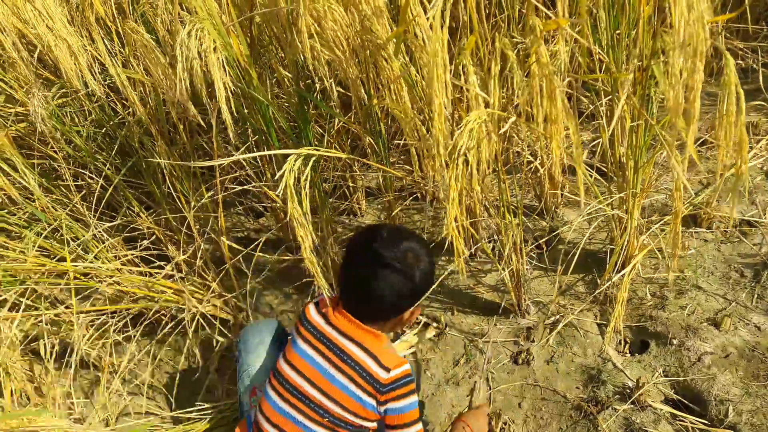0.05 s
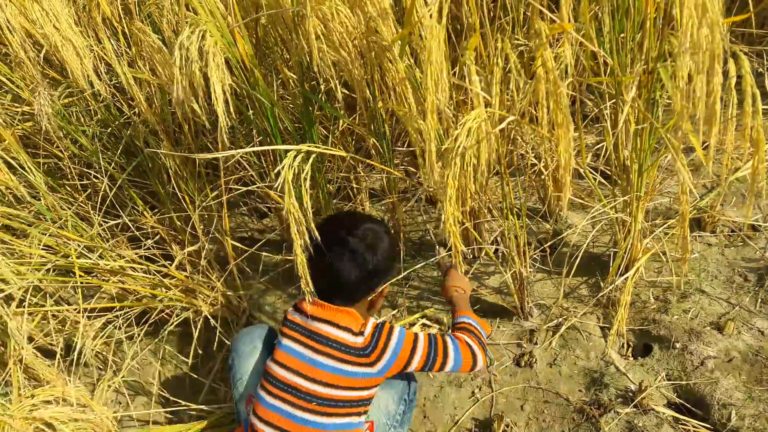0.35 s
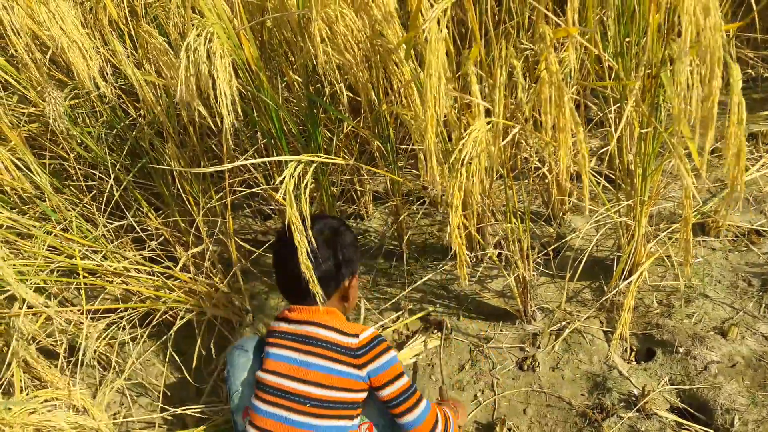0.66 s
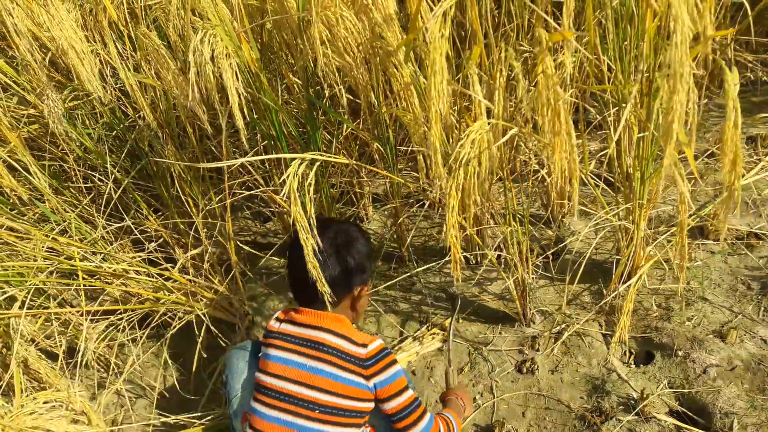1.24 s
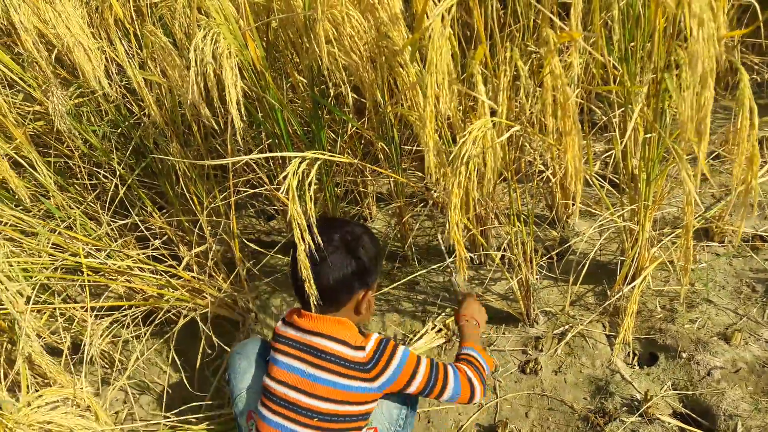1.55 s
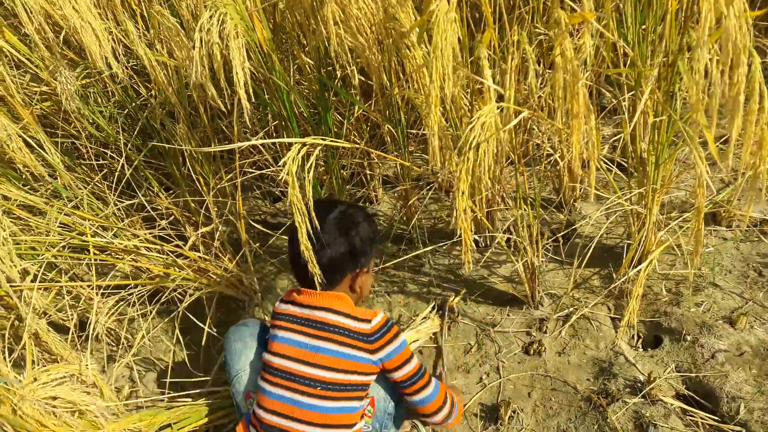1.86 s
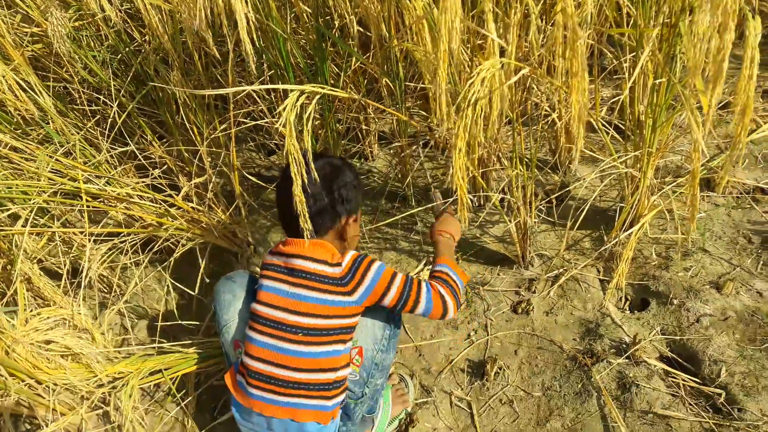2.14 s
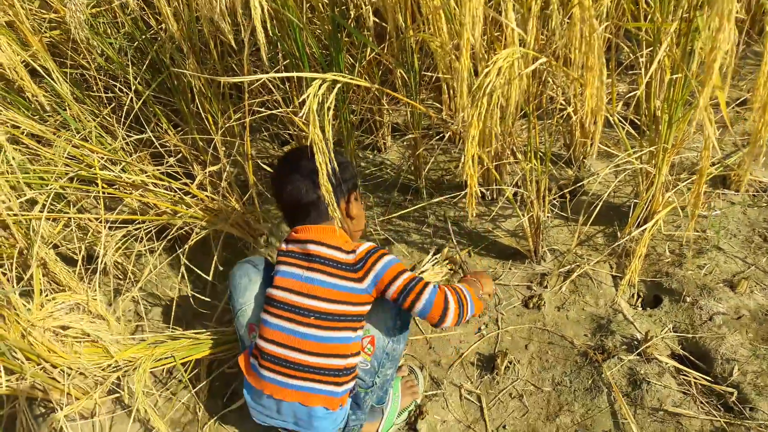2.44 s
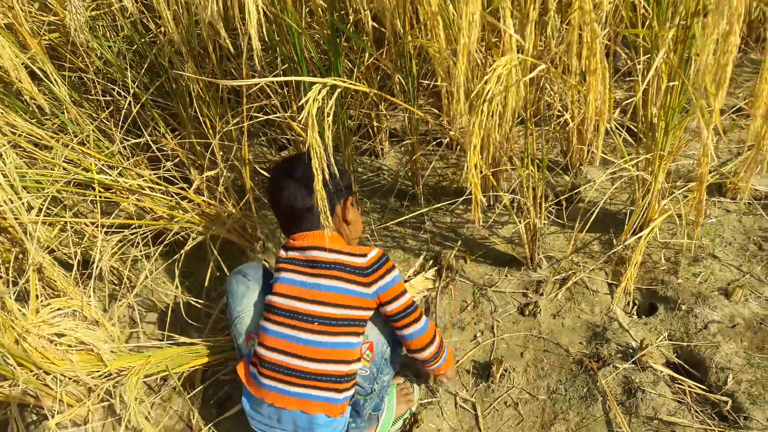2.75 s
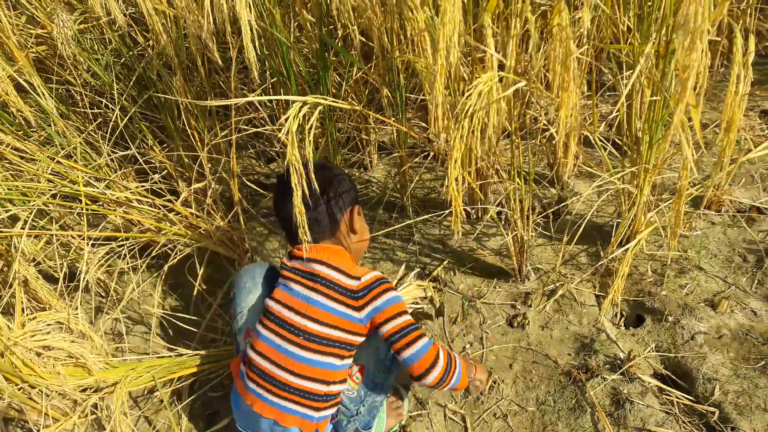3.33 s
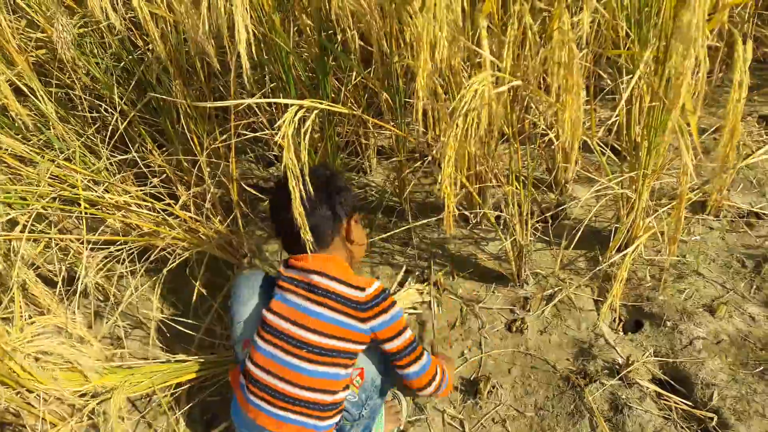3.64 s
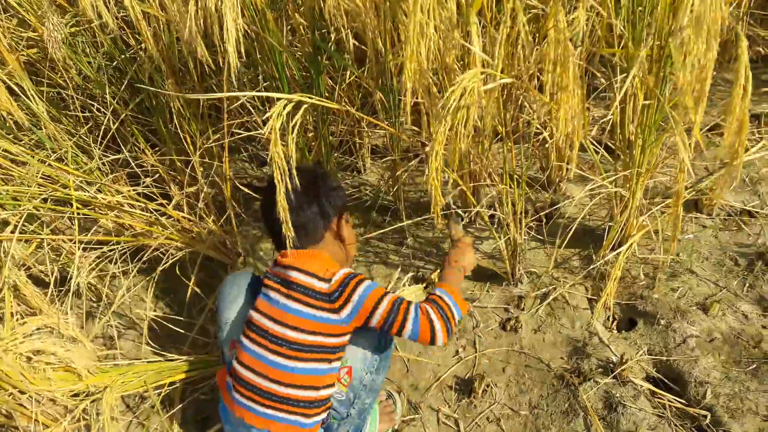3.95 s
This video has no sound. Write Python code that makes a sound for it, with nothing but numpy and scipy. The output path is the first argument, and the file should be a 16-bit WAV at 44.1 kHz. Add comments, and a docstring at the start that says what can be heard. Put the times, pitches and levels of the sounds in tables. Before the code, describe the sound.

A small hand tool chops into dry earth while dry stalks rustle and snap.

```python
"""At the edge of a rice field, a child chops at dry, cracked earth with a small hand tool.
Each blow is a crunch of breaking crust, a hollow clack of tool and clod and a thud as the ground
gives way, followed by a spray of crumbs. Loose soil is tapped, brushed and rubbed.
Dry stalks rustle and snap close by; far away a single-cylinder engine chugs in the open air."""
import sys
import numpy as np
from scipy import signal
from scipy.fft import rfft, irfft
from scipy.io import wavfile

SR = 44100
rng = np.random.default_rng(int(sys.argv[2]) if len(sys.argv) > 2 else 0)


def materialize(psi):
    """Save the field psi as 16-bit PCM at rate SR to the path in sys.argv[1].

    A 1-D psi becomes a single channel; in a 2-D psi each row is a channel.
    """
    bounded = np.clip(np.atleast_2d(psi).T, -1, 1)
    quanta = np.round(bounded * 32767).astype(np.int16)
    wavfile.write(sys.argv[1], SR, quanta)


N = 176400
TIME = np.arange(N) / SR
CUTOFF_HZ = 15700


def from_db(db):
    """Decibels to gain."""
    return 10 ** (np.asarray(db) / 20)


def unit_rms(x):
    """Scale to rms 1."""
    return x / np.sqrt(np.mean(x ** 2) + 1e-20)


def curves(rows):
    """One linear curve per column; the first column is time in seconds."""
    times_s, *columns = np.transpose(rows)
    return [np.interp(TIME, times_s, column) for column in columns]


def drift(rate_hz):
    """Slow random wander, spread about 1."""
    control_hz = 100
    noise = rng.standard_normal(int(N / SR * control_hz) + 200)
    pole = np.exp(-2 * np.pi * rate_hz / control_hz)
    slow = signal.lfilter([1], [1, -2 * pole, pole * pole], noise)[190:]  # skip the settling
    return np.interp(TIME * control_hz, np.arange(len(slow)), unit_rms(slow))


def colour(x, spectrum):
    """Minimum-phase filter with the given spectral shape and unit power gain."""
    size = 8192
    hz, db = np.transpose(spectrum)
    bins_hz = np.maximum(np.arange(size // 2 + 1) * SR / size, 1)
    gain = from_db(np.interp(np.log(bins_hz), np.log(hz), db))
    gain /= np.hypot(1, (0.5 * hz[0] / bins_hz) ** 2)  # bass roll-off
    gain /= np.sqrt(np.mean(gain[bins_hz < CUTOFF_HZ] ** 2))
    cepstrum = irfft(np.log(gain))
    cepstrum[1:size // 2] *= 2
    cepstrum[size // 2 + 1:] = 0
    impulse = irfft(np.exp(rfft(cepstrum)))[:size // 2]
    return signal.fftconvolve(x, impulse)[:N]


def band(x, hz, width_hz, passes=1):
    """Two-pole resonance, applied once per pass; rms 1."""
    radius = np.exp(-np.pi * width_hz / SR)
    feedback = [1, -2 * radius * np.cos(2 * np.pi * hz / SR), radius * radius]
    for _ in range(passes):
        x = unit_rms(signal.lfilter([1, 0, -1], feedback, x))
    return x


def grains(per_s, spread_db):
    """Tiny fractures of uneven size at random moments; rms 1."""
    sizes = from_db(spread_db * np.minimum(rng.exponential(1, N), 5))
    signs = rng.choice([-1, 1], N)
    return unit_rms(sizes * signs * (rng.random(N) < per_s / SR))


def burst(start_s, rise_s, t60_s, start_db=-20):
    """Envelope that rises to 1 and dies away, linear in dB."""
    age = TIME - start_s
    db = np.where(age < rise_s, start_db * (1 - age / rise_s), -60 * (age - rise_s) / t60_s)
    return from_db(np.clip(db, -300, 0)) * (age >= 0)


def swell(centre_s, half_s):
    """Gaussian envelope, peak 1."""
    return np.exp(-0.5 * ((TIME - centre_s) / half_s) ** 2)


# Spectra of breaking crust and of crumbs. Each row: frequency in Hz, relative gain in dB.
CRUNCH_SPECTRUM = [(130, -17), (220, -2.5), (400, -8), (540, -11.5), (760, -22.5), (1250, 0), (1800, 0),
                   (2300, -2), (2750, -7.5), (3500, 0.5), (4400, 1.5), (5200, -3), (5800, -14.5), (7000, 3),
                   (10000, -6.5), (16000, -7)]
CRUMB_SPECTRUM = [(120, -16), (220, 2.5), (460, -10), (800, -1.5), (1300, 1), (1900, 2.5), (2700, -15),
                  (4100, 2.5), (5700, -6.5), (7300, 5), (10000, 1.5), (16000, 0)]
# Tool blows. Each row: start and rise in seconds, crunch level in dB, its 2.8-6 kHz edge and its
# treble in relative dB, crumb level in dB, crumb T60 in seconds, thud pitch near its peak in Hz,
# thud level in dB, then frequency in Hz and level in dB for each of three clack resonances.
BLOWS = [(0.7544, 0.001136, -17, -14.5, 3, -27.5, .11, 323, -32, 696, -35.5, 1617, -23.5, 2070, -28),
         (2.0580, .0016, -12.5, -3, -3, -28.5, 0.13, 314, -24, 760, -30, 1230, -20, 1630, -19.5),
         (2.5085, 0.0022, -15, -5, 0.5, -25, 0.12, 310, -27, 874, -24, 1174, -17.5, 1794, -19.5),
         (2.9477, 0.0019, -17.5, -1.5, 1.5, -28.5, 0.22, 292, -27, 1026, -28, 1184, -20.5, 2260, -31),
         (3.4187, 0.00271, -18, -1.5, -1, -23, 0.094, 304, -25, 730, -25, 1284, -18, 2290, -26),
         (3.8720, 0.0026, -15.5, 1.5, -2, -28.5, 0.12, 257, -26.5, 1055, -18, 1515, -22.5, 1760, -17.5)]


def blows():
    """The crust breaks, tool and ground ring briefly, crumbs scatter."""
    crust = grains(per_s=14000, spread_db=2.3)
    low = signal.sosfiltfilt(signal.butter(2, 2800, "low", fs=SR, output="sos"), crust)
    treble = signal.sosfiltfilt(signal.butter(2, 6000, "high", fs=SR, output="sos"), crust)
    edge = crust - low - treble
    crunch = spray = body = 0
    for (start_s, rise_s, crunch_db, edge_db, treble_db, crumb_db, crumb_t60_s,
         thud_hz, thud_db, *modes) in BLOWS:
        grit = low + from_db(edge_db) * edge + from_db(treble_db) * treble
        crunch += from_db(crunch_db) * burst(start_s, rise_s, t60_s=0.019, start_db=-11) * grit
        spray += from_db(crumb_db) * burst(start_s, rise_s=0.0046, t60_s=crumb_t60_s)
        body += from_db(thud_db) * thud(start_s, thud_hz)
        for hz, db in zip(modes[::2], modes[1::2]):
            body += from_db(db) * clack(start_s + rise_s, hz)
    crumbs = spray * grains(per_s=5000, spread_db=5)
    return body + colour(crunch, CRUNCH_SPECTRUM) + colour(crumbs, CRUMB_SPECTRUM)


def clack(peak_s, hz, rise_s=0.000901):
    """One heavily damped resonance of tool and clod."""
    start_s = peak_s - rise_s
    return burst(start_s, rise_s, t60_s=0.02) * np.sin(2 * np.pi * hz * (TIME - start_s))


def thud(start_s, hz, delay_s=0.0018, rise_s=0.0048, sag_per_s=24):
    """The ground gives way: a few cycles that swell and sag in pitch."""
    age = np.maximum(TIME - start_s - delay_s, 0)
    envelope = (age / rise_s * np.exp(1 - age / rise_s)) ** 2
    onset_hz = 1.133 * hz
    cycles = onset_hz * (1 - np.exp(-sag_per_s * age)) / sag_per_s
    return envelope * np.sin(2 * np.pi * cycles)


# Light taps of clods and tool. Each row: start in seconds, level in dB.
TAPS = [(0.135, -30), (0.148, -33), (0.768, -30), (1.131, -44), (1.139, -31.5), (1.153, -28.5),
        (1.786, -45), (2.0122, -34), (3.005, -29.5), (3.034, -39.5), (3.8841, -21.5), (3.938, -39)]
# Tap spectrum. Each row: frequency in Hz, relative gain in dB.
TAP_SPECTRUM = [(150, -9), (340, 7.5), (560, -9), (1300, -3), (2400, -8), (3800, 1), (5700, -11.5),
                (7300, -4.5), (16000, -3.5)]
# Brushed or trickling soil. Each row: centre and half length in seconds, level in dB.
SCUFFS = [(0.829, 0.016, -41.5), (1.151, 0.019, -39), (1.338, 0.0097, -38.5), (2.428, 0.0077, -45.5),
          (2.598, 0.013, -42.5), (3.004, 0.068, -46.5)]


def loose_soil():
    """Clods and tool tap the ground; loose soil is brushed or trickles down."""
    taps = sum(from_db(db) * burst(start_s, rise_s=0.0004, t60_s=0.026) for start_s, db in TAPS)
    taps *= grains(per_s=9000, spread_db=2.3)
    scuffs = sum(from_db(db) * swell(centre_s, half_s) for centre_s, half_s, db in SCUFFS)
    scuffs *= grains(per_s=4000, spread_db=0.5)
    return colour(taps, TAP_SPECTRUM) + colour(scuffs, CRUMB_SPECTRUM)


# Rubs. Each row: centre and half length in seconds, band centre in Hz, level in dB.
RUBS = [(0.152, 0.012, 407, -56.5), (1.156, 0.016, 340, -58), (1.145, 0.013, 2500, -42.5),
        (2.267, 0.065, 690, -57.5), (2.4, 0.063, 2050, -56.5), (2.43, 0.026, 86, -46.5)]


def soil_rubs(width_octaves=0.7):
    """Hand and tool drag over the soil with soft, dull friction."""
    friction = grains(per_s=5000, spread_db=2)
    rubs = 0
    for centre_s, half_s, hz, db in RUBS:
        width_hz = hz * width_octaves * np.log(2)
        rubs += from_db(db) * swell(centre_s, half_s) * band(friction, hz, width_hz, passes=2)
    return rubs


# Rustle. Each row: time in seconds, hiss level in dB, papery level in dB.
RUSTLE_LEVELS = [(0, -40, -39), (.14, -37.5, -38.5), (.27, -40.5, -39), (.33, -44, -43.5),
                 (.42, -44.5, -48), (.66, -48, -56.5), (.8, -45, -50.5), (.88, -45, -53), (.97, -44, -38.5),
                 (1.07, -44.5, -52.5), (1.21, -44, -52.5), (1.29, -44, -41.5), (1.37, -47, -39.5),
                 (1.42, -51, -45.5), (1.48, -50, -39.5), (1.57, -45.5, -42), (1.66, -48, -50.5),
                 (1.9, -44, -53), (2.0, -42, -50), (2.05, -37, -40.5), (2.16, -41, -45.5),
                 (2.3, -44.5, -53.5), (2.55, -47, -60), (2.64, -48.5, -57), (2.72, -56.5, -62.5),
                 (2.92, -57.5, -58.5), (3.1, -53, -59), (3.22, -50.5, -55.5), (3.31, -53.5, -63),
                 (3.42, -48.5, -57), (3.62, -48.5, -57.5), (4, -53, -56.5)]
# Spectra of the two rustle layers. Each row: frequency in Hz, relative gain in dB.
HISS_SPECTRUM = [(300, -21), (700, -6), (1100, -8.5), (1900, -4), (2650, -5.5), (3500, -1), (4200, -2),
                 (5700, -13.5), (7100, -17), (9000, 0.5), (12200, 1.5), (16000, 3)]
PAPERY_SPECTRUM = [(250, -17), (400, -13), (600, -30), (1000, -10.5), (1500, -9.5), (1900, -7.5),
                   (2450, -30), (3000, -11), (3800, -5.5), (4700, -7), (5600, -12.5), (6600, 1), (7300, 1),
                   (8700, -5.5), (10000, -4.5), (16000, -4)]


def stalk_rustle():
    """Dry leaves and ears rub in countless tiny ticks."""
    flutter_db = drift(rate_hz=23)
    rustle = 0
    for db, spectrum in zip(curves(RUSTLE_LEVELS), [HISS_SPECTRUM, PAPERY_SPECTRUM]):
        ticks = from_db(db + flutter_db) * grains(per_s=14000, spread_db=3.5)
        rustle += colour(ticks, spectrum)
    return rustle


# Snapping stalks. Each row: start in seconds, level in dB, ring frequency in Hz.
SNAPS = [(0.0248, -25.5, 7400), (0.3485, -30, 7200), (0.4233, -21.5, 11100), (0.4743, -38, 8800),
         (0.7034, -33, 8300), (0.8192, -39, 7100), (0.986, -39, 4400), (1.1014, -35, 14000),
         (1.729, -36.5, 6800), (1.788, -35, 6540), (1.8062, -35, 11700), (2.0108, -37, 11300),
         (2.019, -32, 11000), (2.0328, -32, 8500), (2.7377, -38.5, 12500), (3.033, -25.5, 7700),
         (3.4445, -38, 7600), (3.892, -39, 7300)]
# Crack spectrum. Each row: frequency in Hz, relative gain in dB.
SNAP_SPECTRUM = [(500, -32), (1500, -9), (2700, -35), (4000, -9.5), (5600, -18.5), (7300, 1), (10000, 0.5),
                 (11700, 2), (13500, 4), (16000, 7)]


def stalk_snaps(ring_db=-3.5):
    """Straws crack, each with a bright ring of its own."""
    fibres = grains(per_s=24000, spread_db=3.7)
    crack = colour(fibres, SNAP_SPECTRUM)
    snaps = 0
    for start_s, db, hz in SNAPS:
        ring = from_db(ring_db) * band(fibres, hz, width_hz=580)
        snaps += from_db(db) * burst(start_s, rise_s=0.00081, t60_s=0.01) * (crack + ring)
    return snaps


# Engine speed. Each row: time in seconds, firing rate in Hz.
FIRING_RATE = [(0, 27.85), (.9, 27.48), (1.7, 27.88), (2.4, 27.55), (2.8, 27.55), (3.25, 27.12),
               (3.75, 27.42), (4, 27.45)]
# Exhaust harmonics. Each row: multiple of the firing rate, rms level in dB.
EXHAUST_HARMONICS = [(1, -97), (2, -60.5), (3, -57), (4, -51), (5, -61), (6, -65), (7, -72.5), (8, -92.5)]
# Clatter spectrum. Each row: frequency in Hz, relative gain in dB.
CLATTER_SPECTRUM = [(180, 7), (300, -3.5), (480, -4), (720, -1.5), (950, -8.5), (1250, 1), (1600, -8),
                    (2100, -3), (2700, -15.5), (4000, -5.5), (8000, -37.5)]
# Knock resonances. Each row: centre in Hz, width per pass in Hz, relative level in dB.
KNOCK_MODES = [(768, 300, -6), (1170, 320, -3)]
# Knock loudness. Each row: time in seconds, level in dB.
KNOCK_LEVEL = [(0, -70), (2.6, -73), (3.1, -59), (3.55, -61), (4, -59.5)]


def far_engine(waver_db=0.55, clatter_db=-64, lead_cycles=0.0514, knock_scatter_db=1.2):
    """Each firing gives a low exhaust puff, a light knock and a faint clatter."""
    cycles = 0.15 + np.cumsum(curves(FIRING_RATE)[0]) / SR
    load_db = waver_db * drift(rate_hz=2.7)
    puffs = sum(from_db(db + load_db) * np.sqrt(2) * np.cos(2 * np.pi * multiple * cycles)
                for multiple, db in EXHAUST_HARMONICS)
    gate = np.exp(1.95 * np.cos(2 * np.pi * (cycles + lead_cycles)))  # one pulse per firing
    rattle = colour(gate * rng.standard_normal(N), CLATTER_SPECTRUM)
    clatter = from_db(clatter_db + load_db) * unit_rms(rattle)
    jitter_cycles = 0.012 * drift(rate_hz=20)
    firings = np.diff(np.floor(cycles + lead_cycles + jitter_cycles), prepend=0) > 0
    kicks = firings * from_db(knock_scatter_db * drift(rate_hz=6.7)) + 1e-18
    knock = sum(from_db(db) * band(kicks, hz, width_hz, passes=2) for hz, width_hz, db in KNOCK_MODES)
    return puffs + clatter + from_db(curves(KNOCK_LEVEL)[0]) * knock


# Background spectrum. Each row: frequency in Hz, relative gain in dB.
AIR_SPECTRUM = [(20, -12), (45, -7.5), (75, 5.5), (130, 1), (200, -16), (400, -24), (750, -18.5),
                (1300, -22), (2000, -24), (2600, -25), (4000, -54), (16000, -71)]


def open_air(level_db=-53.5):
    """Low, steady background of the fields."""
    return from_db(level_db) * unit_rms(colour(rng.standard_normal(N), AIR_SPECTRUM))


def scene():
    """All sources heard from one point, alike in both ears."""
    digging = blows() + loose_soil() + soil_rubs()
    stalks = stalk_rustle() + stalk_snaps()
    return np.tile(digging + stalks + far_engine() + open_air(), (2, 1))


# Microphone response. Each row: frequency in Hz, relative gain in dB.
MIC_RESPONSE = [(30, -0.5), (6500, 1), (7350, 2), (7950, -2.5), (8650, 2.5), (9900, -1.5), (11100, 2),
                (13400, -2.5), (14900, 1.5), (16000, -11)]


def record(dry):
    """The microphone ripples the treble; a steep low-pass cuts the top."""
    heard = np.array([colour(channel, MIC_RESPONSE) for channel in dry])
    lowpass = signal.ellip(12, 0.1, 80, CUTOFF_HZ, fs=SR, output="sos")
    return signal.sosfilt(lowpass, heard)


dry = scene()
out = record(dry)
materialize(out)
```